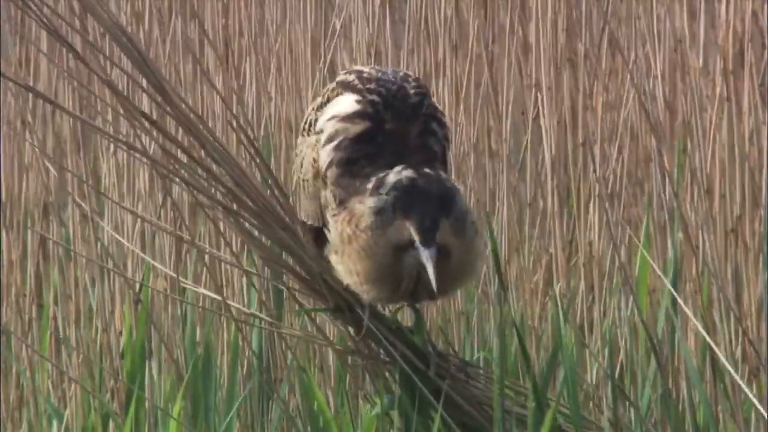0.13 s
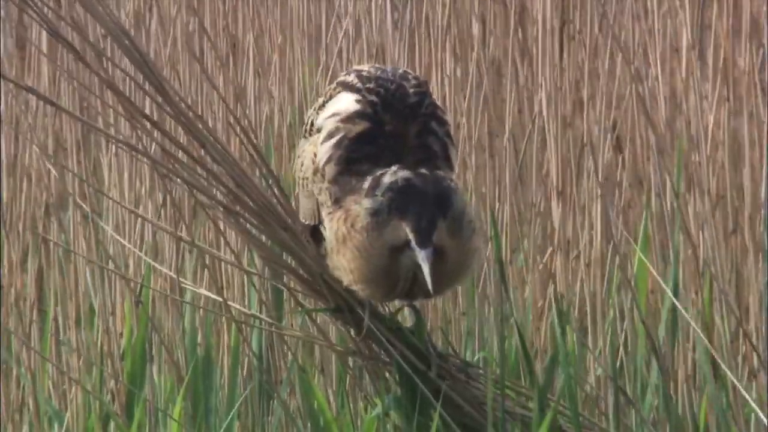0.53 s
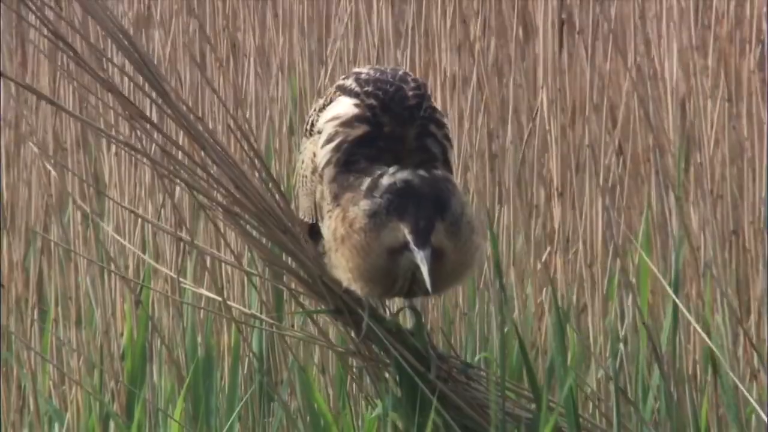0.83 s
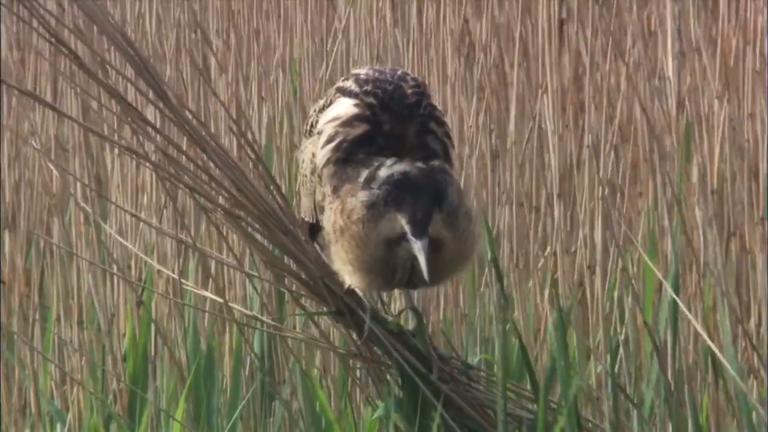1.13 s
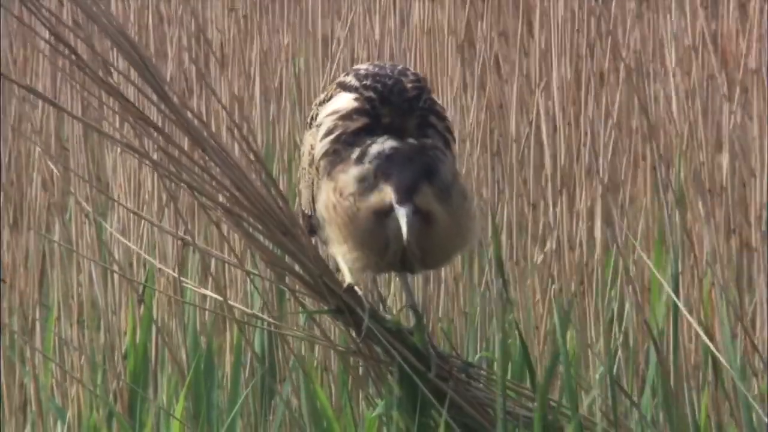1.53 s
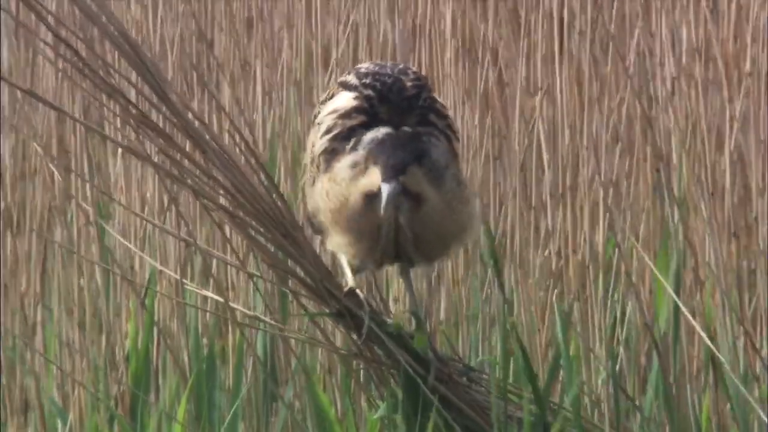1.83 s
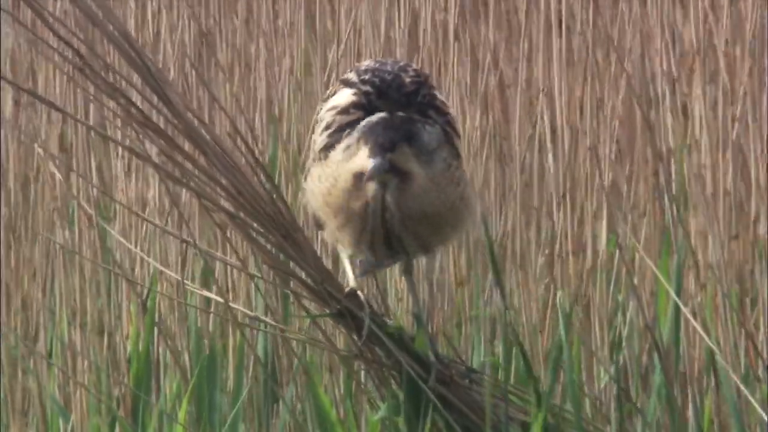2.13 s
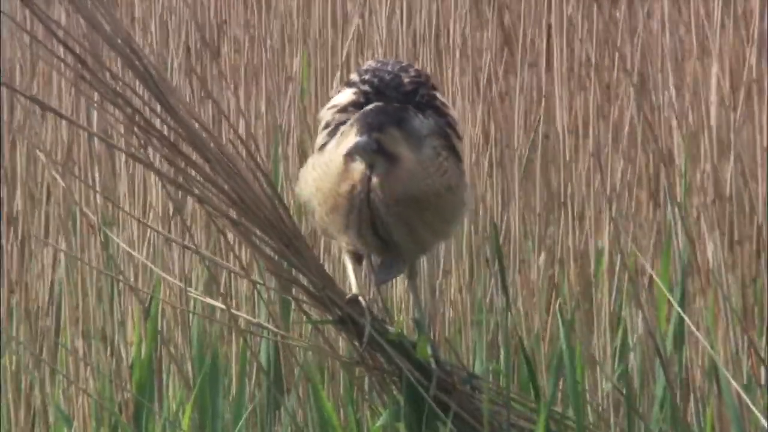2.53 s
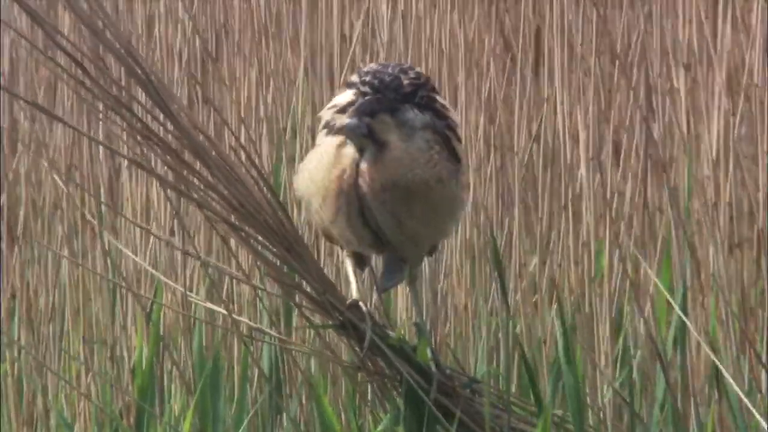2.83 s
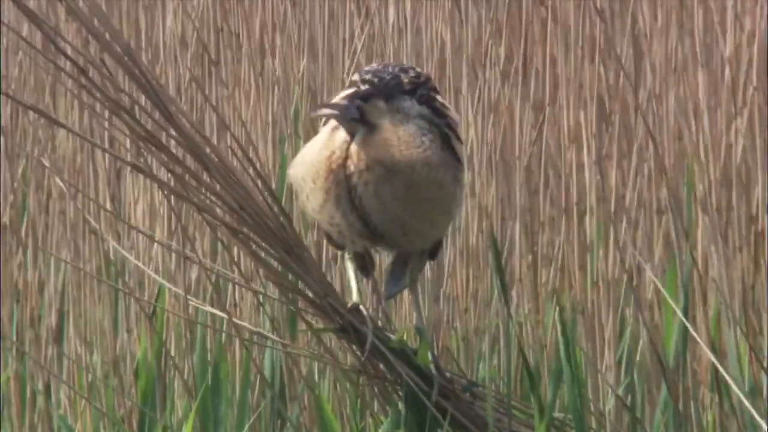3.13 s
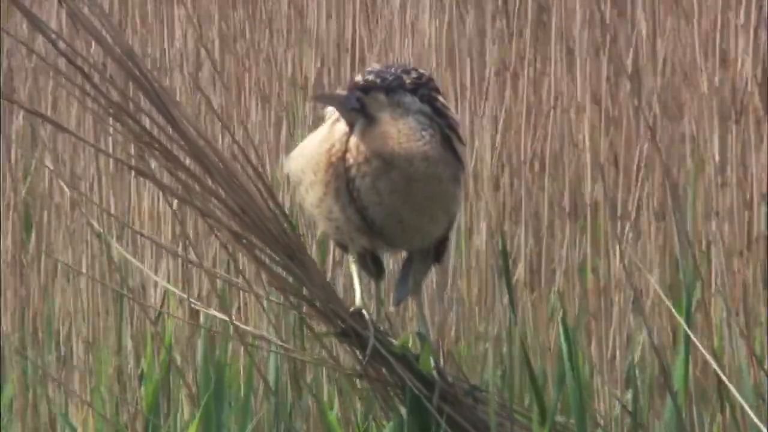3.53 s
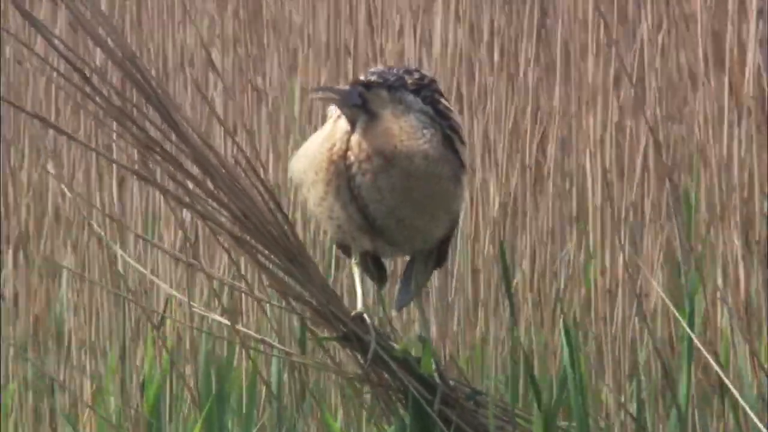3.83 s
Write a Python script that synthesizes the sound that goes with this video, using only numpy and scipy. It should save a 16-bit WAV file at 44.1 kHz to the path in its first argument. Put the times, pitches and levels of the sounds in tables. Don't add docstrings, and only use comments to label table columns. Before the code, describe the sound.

A bittern gives one deep, hollow boom in a reed bed while small birds chirp and croak

```python
import sys
import numpy as np
from scipy import signal
from scipy.fft import rfft, irfft
from scipy.io import wavfile
from scipy.ndimage import uniform_filter1d

SR = 44100
rng = np.random.default_rng(int(sys.argv[2]) if len(sys.argv) > 2 else 0)


def transcribe(signal):
    frames = np.atleast_2d(signal).T
    limited = np.clip(frames, -1, 1)
    pcm = np.round(limited * 32767).astype(np.int16)
    wavfile.write(sys.argv[1], SR, pcm)


def magnitude_from_level(level_db):
    exponent = np.asarray(level_db, float) / 20
    return 10 ** exponent


N = 176400


def walk(rate, size=N):
    k = max(int(SR / rate), 2)
    steps = np.repeat(rng.standard_normal(size // k + 1), k)
    return 1.415 * uniform_filter1d(uniform_filter1d(steps, k), k)[:size]


def column(table, k, x, warp=lambda v: v):
    rows = np.array(table, float)
    return np.interp(warp(x), warp(rows[:, 0]), rows[:, k])


def band(x, lo_hz, hi_hz, order=2):
    return signal.sosfilt(signal.butter(order, [lo_hz, hi_hz], "band", fs=SR, output="sos"), x)


def note(start, length, hz, db, edge=0.0022, swell=0.0021):
    waver_hz, waver_db = 45, 2.5
    t = np.arange(int(length * SR)) / SR
    i = int(start * SR)
    out = np.zeros(N + len(t))
    shape = np.clip(np.minimum(t / max(edge, swell), (length - t) / edge), 0, 1)
    pitch = hz(t / length) + waver_hz * walk(150, len(t)) * hz(0.) / 6000
    level = np.sqrt(2) * magnitude_from_level(db + waver_db * walk(90, len(t)))
    out[i:i + len(t)] = level * shape * np.sin(2 * np.pi * np.cumsum(pitch) / SR)
    return out[:N]


def glides(table):
    return sum(note(s, d, lambda u: a + (b - a) * u, db) for s, d, a, b, db in table)


def pan(pan_db):
    return magnitude_from_level(np.array([[pan_db], [-pan_db]]) / 2)


def place(x, pan_db, lag, wet_db, apart_db, t60=0.36):
    t = np.arange(int(.9 * SR)) / SR
    tails = rng.standard_normal((3, len(t))) * magnitude_from_level(-60 * t / t60) * (t > .004)
    tails = tails / np.sqrt(np.sum(tails[0] ** 2))
    wet = signal.fftconvolve(x[None], tails, axes=1)[:, :N] * magnitude_from_level(wet_db)
    mono = x + wet[0]
    late = irfft(rfft(mono) * np.exp(-2j * np.pi * np.arange(N // 2 + 1) * lag / N), N)
    return (np.array([mono, late]) + magnitude_from_level(apart_db) * wet[1:]) * pan(pan_db)


# time in seconds, pitch in Hz, level in dB, level of the octave in dB.
GULP = [
    (.008, 130, -37, -73),
    (.028, 135, -17, -59),
    (.046, 129, -14.5, -51.5),
    (.066, 128, -25, -63),
]
BOOM = [
    (.062, 141.6, -27, -65),
    (.083, 145.7, -12, -48),
    (.105, 146, -13, -45.5),
    (.14, 142, -10.5, -39.5),
    (.2, 142.5, -9, -43.5),
    (.3, 137.7, -9.5, -41),
    (.36, 141.8, -14.5, -59.5),
    (.425, 136, -27.5, -74),
    (.465, 142.1, -26.5, -71),
]
# start in seconds, length in seconds, first and last pitch in Hz, level in dB.
SIGH = (.32, .12, 112, 86, -36)
# delay in seconds, level in dB.
BANKS = [
    (.585, -24),
    (.88, -32),
]


def bittern(t):
    call = 0
    for table, ring_s in ((GULP, 0), (BOOM, .11)):
        first_s, last_s = table[0][0], table[-1][0]
        phase = 2 * np.pi * np.cumsum(uniform_filter1d(column(table, 1, t), size=500)) / SR
        on = np.clip(np.minimum(t - first_s, last_s + ring_s - t) / 0.0067, 0, 1)
        on = on * magnitude_from_level(-190 * np.clip(t - last_s, 0, 1))
        tone = np.sqrt(2) * uniform_filter1d(magnitude_from_level(column(table, 2, t)), size=700) * on
        octave = np.sqrt(2) * uniform_filter1d(magnitude_from_level(column(table, 3, t)), size=700) * on
        call = call + tone * np.sin(phase) + octave * np.cos(2 * phase)
    s, d, a, b, db = SIGH
    sigh = sum(note(s, d, lambda u: k * (a + (b - a) * u), db - 5 * (k - 1), edge=.04) for k in (1, 2))
    echo = sum(magnitude_from_level(g) * np.roll(call, int(delay_s * SR)) for delay_s, g in BANKS)
    echo = band(echo, 83, 170) * magnitude_from_level(-55 * np.clip(t - .69, 0, .3))
    return (call + sigh + echo) * pan(-1.37)


# start in seconds, length in seconds, first and held pitch in Hz, level in dB.
HOOKS = [(.002, 0.036, 5800, 5654, -37.5), (0.027, 0.062, 6830, 4515, -32),
         (0.069, 0.064, 2933, 3750, -35.5), (0.161, 0.11, 3766, 3760, -48.5),
         (0.397, 0.047, 6650, 5756, -31), (0.754, 0.11, 6910, 4524, -35.5),
         (0.893, 0.089, 2750, 2992, -49.5), (1.121, 0.037, 6950, 5860, -35), (2.0, .125, 2460, 2464, -59),
         (2.756, 0.03, 7710, 7060, -50), (3.017, 0.057, 5110, 5054, -41)]
# start in seconds, length in seconds, middle pitch in Hz, flutter in Hz, level in dB.
BUZZES = [
    (.001, 0.045, 6360, 394, -46),
    (0.199, 0.16, 6870, 168, -38.5),
    (1.298, 0.14, 8900, 150, -68),
    (1.518, 0.082, 3423, 201, -45.5),
    (1.936, 0.31, 6110, 196, -56),
    (2.389, 0.077, 6490, 150, -49.5),
    (2.614, 0.16, 4960, 150, -52.5),
    (2.764, 0.17, 6830, 168, -49.5),
    (1.258, 0.037, 7600, 99, -58),
    (3.944, 0.061, 7300, 486, -59),
]
# start in seconds, length in seconds, first and last pitch in Hz, level in dB.
DARTS = [
    (1.155, 0.022, 5800, 2200, -34.5),
    (1, 0.0153, 1900, 850, -52),
    (.452, 0.044, 3600, 2600, -40.5),
    (3.708, 0.035, 6900, 6500, -51.5),
    (2.945, .068, 5280, 5040, -46),
    (2.425, 0.039, 6800, 5400, -52),
]
SLIDES = [
    (.004, 0.029, 6770, 5940, -46),
    (.05, 0.012, 2990, 3010, -42.5),
    (.343, 0.036, 5610, 4070, -42),
    (.49, 0.03, 4300, 5530, -47),
    (.531, 0.034, 4760, 3930, -50.5),
    (.885, 0.022, 4750, 3820, -48.5),
    (1.24, 0.052, 4530, 4030, -56.5),
    (2.43, 0.026, 5900, 4360, -50),
    (2.505, .055, 5260, 4920, -56),
    (2.565, 0.0335, 4900, 4595, -48),
]


def songbird():
    settle_s, sag_s, sag_share = .0062, .04, .1

    def hook(u, d, a, b):
        quick = (1 - sag_share) * np.exp(-u * d / settle_s)
        slow = sag_share * np.exp(-u * d / sag_s)
        return b + (a - b) * (quick + slow)

    def flutter(u, middle, swing):
        return middle + swing * walk(330, np.size(u)) * (u > 0)

    hooks = sum(note(s, d, lambda u: hook(u, d, a, b), db, swell=0.0056) for s, d, a, b, db in HOOKS)
    buzz = sum(note(s, d, lambda u: flutter(u, a, w), db, edge=0.012) for s, d, a, w, db in BUZZES)
    near = place(hooks + buzz + glides(DARTS), pan_db=-6.5, lag=3.9, wet_db=-5, apart_db=-2)
    deep = place(glides(SLIDES), pan_db=-3.5, lag=2.22, wet_db=6.0, apart_db=-12.5, t60=0.75)
    return near + deep


def trill():
    first_s, end_s, rate_hz, pulse_hz = 3.093, 3.93, 25.8, 167
    top_hz, low_hz, level_db, weak_db = 5846, 4640, -44.5, -4

    def step_down(u):
        return (top_hz + low_hz) / 2 - (top_hz - low_hz) / 2 * np.tanh(3.2 * (u - .5))

    x = 0
    for k, s in enumerate(np.arange(first_s, end_s, 1 / rate_hz)):
        db = level_db + weak_db * (k % 2) - 1.8 * (s - first_s)
        x = x + note(s, 0.05, step_down, db, edge=0.0045)
    x = x * (1 + .7 * np.sin(2 * np.pi * pulse_hz * np.arange(N) / SR))
    return place(x, pan_db=-2.2, lag=4.3, wet_db=-1.5, apart_db=-3, t60=.2)


# start in seconds, peak level in dB, length in seconds, pitch in Hz, second voice in dB.
CROAKS = [(0.098, -38, .035, 907, -13.5), (0.1365, -28, 0.037, 889, -19), (0.4234, -34, 0.036, 921, -17),
          (0.463, -30.5, 0.038, 889, -14.5), (0.789, -33, 0.041, 871, -7.5), (0.841, -35, 0.032, 895, -13),
          (1.057, -34.5, 0.041, 918, -12), (1.317, -31.5, 0.034, 901, -13), (1.575, -31, 0.04, 945, -11),
          (1.84, -37, 0.032, 937, -9), (1.876, -31.5, 0.033, 889, -13), (2.1305, -32.5, 0.03, 948, -11),
          (2.1725, -31, 0.028, 873, -14), (2.4354, -34, .026, 934, -7.5), (2.473, -33.5, 0.037, 880, -7.5),
          (2.745, -34, 0.0417, 908, -7), (2.9883, -32.5, .046, 917, -9), (3.252, -33, 0.048, 922, -9.5),
          (3.509, -37, .045, 739, -12.5), (3.572, -31.5, .04, 792, -9.5), (3.823, -32, 0.015, 1000, -16),
          (3.8398, -29.5, .038, 1022, -12), (3.874, -34.5, 0.0455, 1063, -18)]
# multiple of the pitch, level in dB.
CROAK_TONES = [
    (3, 0),
    (4, -13),
    (5, -20),
]


def warbler():
    sag, pulse_hz, second_hz = .15, 165, 1860
    out = np.zeros(N + SR)
    for s, db, d, pitch, second_db in CROAKS:
        t = np.arange(int(d * SR)) / SR
        u = t / d
        hz = pitch * (1 - sag * np.clip(1.6 * u - .2, 0, 1) + 0.055 * walk(410, len(t)))
        beat = np.cos(np.pi * np.cumsum(pulse_hz * (1 + 0.2054 * walk(100, len(t)))) / SR) ** 4
        broken = np.clip(3.9 * u - .4, 0, .95)
        shape = np.clip(np.minimum(t / 0.002, (d - t) / 0.02), 0, 1)
        shape = shape * (0.49 * (1 - broken) + broken * beat)
        tone = sum(magnitude_from_level(g) * np.sin(2 * np.pi * k * np.cumsum(hz) / SR) for k, g in CROAK_TONES)
        second = second_hz * (1 + 0.033 * walk(200, len(t)))
        tone = tone + magnitude_from_level(second_db) * np.sin(2 * np.pi * np.cumsum(second) / SR)
        i = int(s * SR)
        out[i:i + len(t)] += magnitude_from_level(db) * shape * tone
    return place(out[:N], pan_db=-4.5, lag=2.7, wet_db=-2.0, apart_db=-18.5, t60=0.18)


# start in seconds, pitch in Hz, level in dB.
PIPS = [
    (0.051, 1067, -46),
    (1.481, 1094, -41),
    (3.71, 1090, -45.5),
]
# start in seconds, length in seconds, first and last pitch in Hz, level in dB.
PEEPS = [(.42, 0.015, 1503, 1820, -45.5), (.51, 0.024, 1230, 1770, -51), (.55, 0.041, 1490, 2155, -49),
         (1.025, 0.034, 2189, 1530, -47), (1.1, 0.052, 1996, 1503, -45.5),
         (1.228, 0.024, 2900, 1456, -47.5), (1.308, 0.028, 2090, 1560, -48), (1.38, 0.018, 1930, 1590, -57),
         (2.67, 0.14, 1240, 1280, -58.5), (3.805, 0.041, 1256, 1345, -58.5), (1.06, 0.012, 1570, 1800, -50)]


def waterbird():
    length_s, sag, octave_db = .034, .1, 4
    pips = sum(note(s, length_s, lambda u: k * hz * (1 - sag * u), db + octave_db * (k - 1))
               for s, hz, db in PIPS for k in (1, 2))
    late_echo = magnitude_from_level(-22) * np.roll(pips, int(.068 * SR))
    early_echo = magnitude_from_level(-18) * np.roll(pips, int(.018 * SR))
    x = pips + late_echo + early_echo + glides(PEEPS)
    return place(x, pan_db=3.0, lag=.6, wet_db=-15.0, apart_db=-10.0, t60=.4)


# start in seconds, peak level in dB.
TICKS = [
    (0.6496, -29.5),
    (0.676, -41.5),
    (0.9756, -45),
    (1.5, -44),
    (.152, -42.5),
    (1.0365, -43.5),
    (1.9667, -41.5),
    (3.1575, -41.5),
    (3.5194, -44.5),
]
# middle in seconds, length in seconds, level in dB.
RUSTLES = [
    (1.587, 0.033, -39.5),
    (2.467, 0.049, -39),
    (2.596, 0.048, -38.5),
    (3.203, 0.017, -57),
    (3.543, 0.026, -57),
]
# time in seconds, level in dB.
GUST = [(0, -66.5), (.65, -67), (1.4, -64), (1.62, -65), (1.8, -72), (2, -63), (2.5, -61), (2.7, -75.5),
        (3.2, -67), (3.55, -65.5), (4, -70)]


def reeds(t):
    x, r = np.zeros(N + SR), np.arange(400) / SR
    for s, db in TICKS:
        i = int(s * SR)
        x[i:i + len(r)] += magnitude_from_level(db + 3.5) * rng.standard_normal(len(r)) * np.exp(-r / 0.0037)
    ticks = band(band(x[:N], 1500, 7600), 2000, 9500)
    ticks = place(ticks, pan_db=-1.5, lag=.3, wet_db=-13, apart_db=3, t60=0.12)
    grains = rng.standard_normal((2, N)) * magnitude_from_level(3.0 * rng.exponential(size=(2, N)))
    hiss = band(grains, 3400, 11000) * magnitude_from_level(1.5 * walk(15))
    hiss = hiss / np.std(hiss) * magnitude_from_level(column(GUST, 1, t) + 6.5)
    strokes = sum(magnitude_from_level(db) * np.exp(-((t - s) / d) ** 2) for s, d, db in RUSTLES)
    drag = strokes * band(grains, 2530, 6000) / np.std(grains)
    return ticks + drag + hiss


# time in seconds, level in dB.
CHORUS = [
    (0, -40),
    (.6, -39.5),
    (1.2, -37),
    (1.7, -52.5),
    (2.5, -50),
    (2.8, -95.5),
    (4, -61),
]


def chorus(t):
    out = 0
    for hz in 1300 * 2 ** np.arange(0, 2.4, .2):
        patch = band(rng.standard_normal((2, N)), hz, 1.16 * hz)
        out = out + patch * magnitude_from_level(3 * walk(9)) / np.sqrt(hz)
    return out / np.std(out) * magnitude_from_level(column(CHORUS, 1, t) - 8)


# pitch in Hz, level in dB per Hz.
AIR = [(30, -28.5), (60, -15), (110, 0), (400, -4.5), (800, -13.5), (2500, -17), (6500, -25),
       (10000, -36.5), (15500, -58.5)]
# pitch in Hz, left-right likeness (1 means the same).
LIKENESS = [(60, 0.77), (400, 0.75), (1400, 0.25), (7000, 0.27)]


def air(t):
    hz = np.maximum(np.arange(N // 2 + 1) * SR / N, 1)
    alike = np.clip(column(LIKENESS, 1, hz, np.log), -1, 1)
    noise = rfft(rng.standard_normal((2, N))) * magnitude_from_level(column(AIR, 1, hz, np.log))
    mid, side = noise * np.sqrt([1 + alike, 1 - alike])
    breeze = irfft(np.array([mid + side, mid - side]), N)
    breeze = breeze * magnitude_from_level(-46) / np.std(breeze.mean(axis=0))
    rumble_db = -20.5 - 9.8 * np.clip(t - .5, 0, 2) + 2.3 * walk(2.3)
    return breeze + band(rng.standard_normal(N), 85, 130) * magnitude_from_level(rumble_db)


def scene():
    t = np.arange(N) / SR
    birds = bittern(t) + songbird() + trill() + warbler() + waterbird()
    return birds + reeds(t) + chorus(t) + air(t)


def top_cut(x):
    return signal.sosfilt(signal.butter(12, 15690, fs=SR, output="sos"), x)


def record(dry):
    mix = dry - .0018
    return top_cut(mix)


dry = scene()
out = record(dry)
transcribe(out)
```